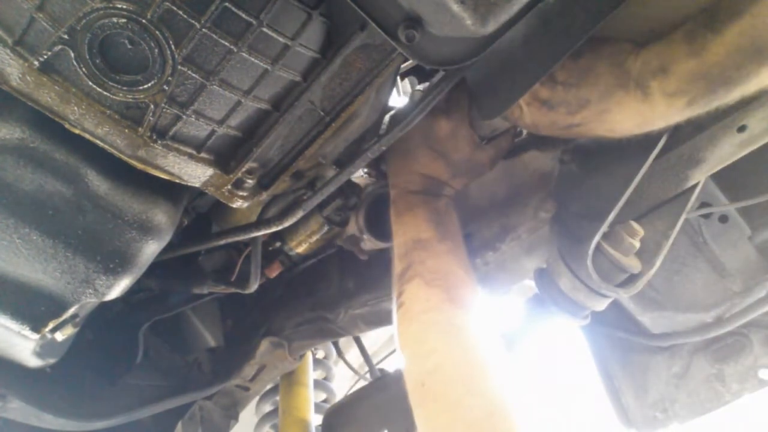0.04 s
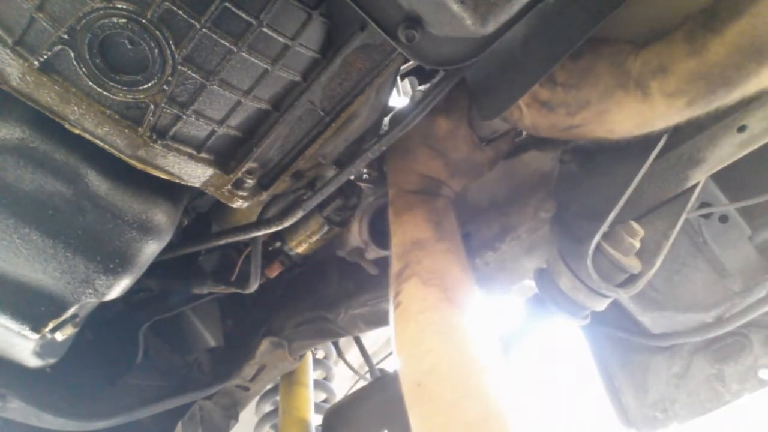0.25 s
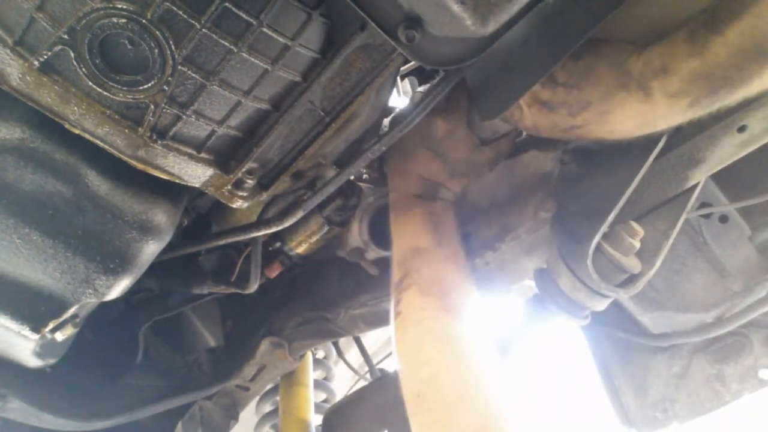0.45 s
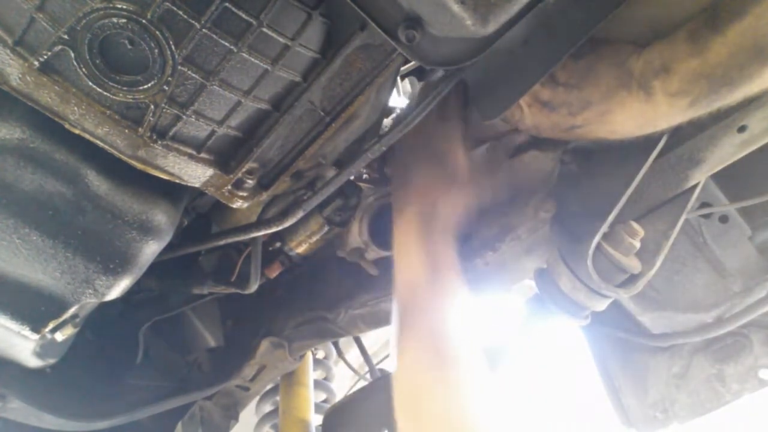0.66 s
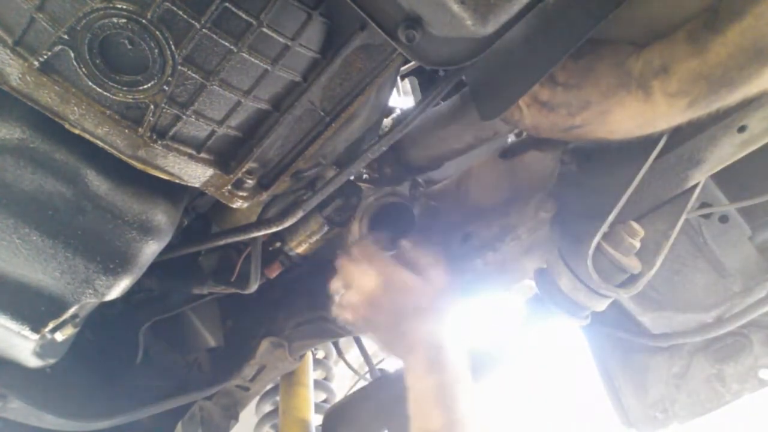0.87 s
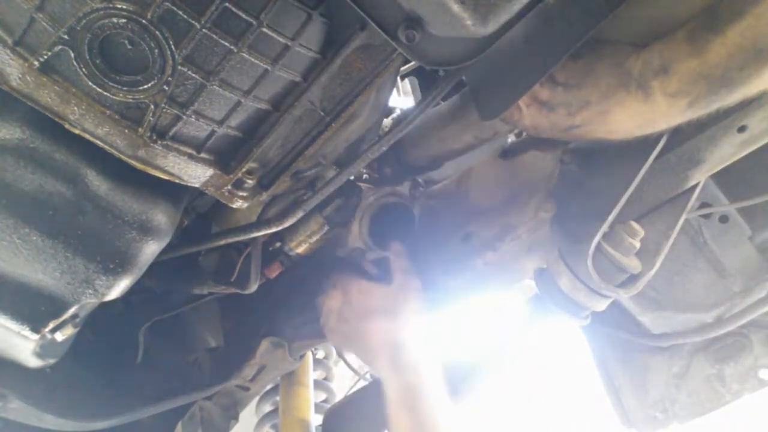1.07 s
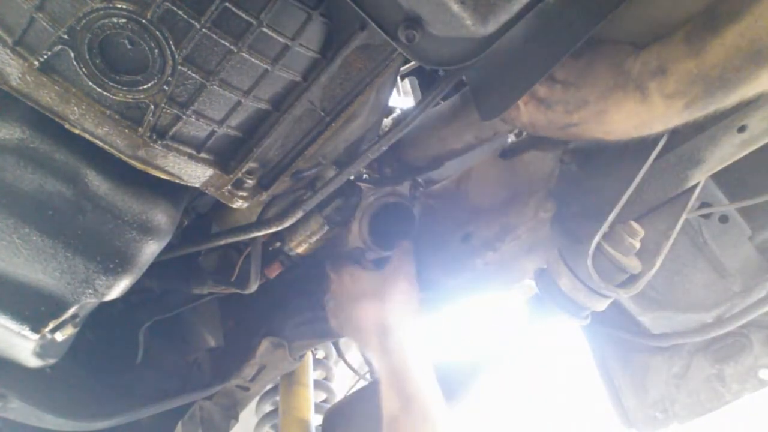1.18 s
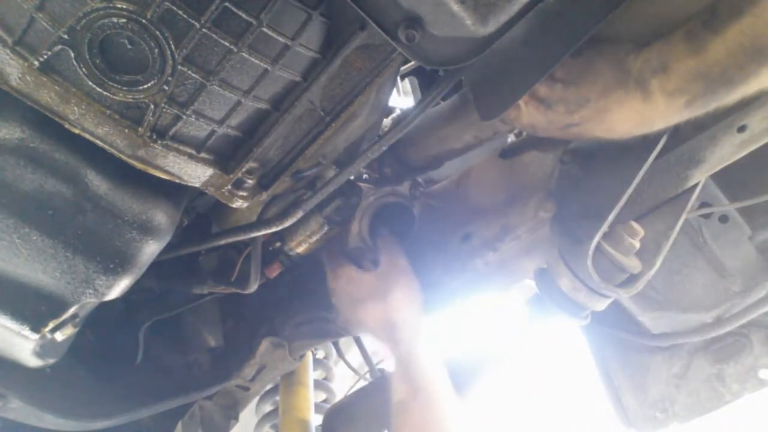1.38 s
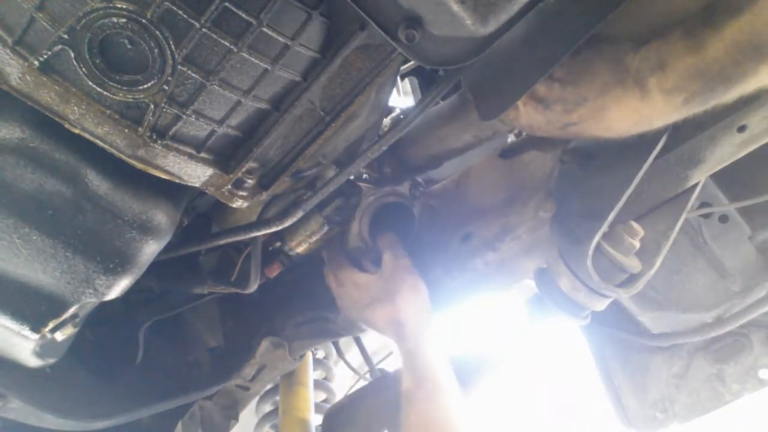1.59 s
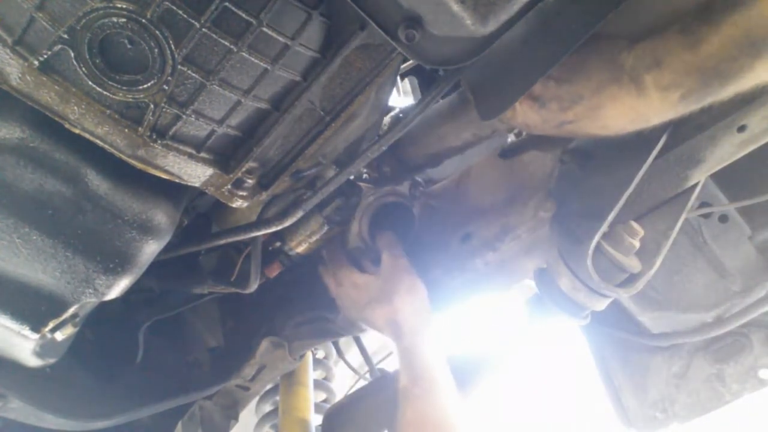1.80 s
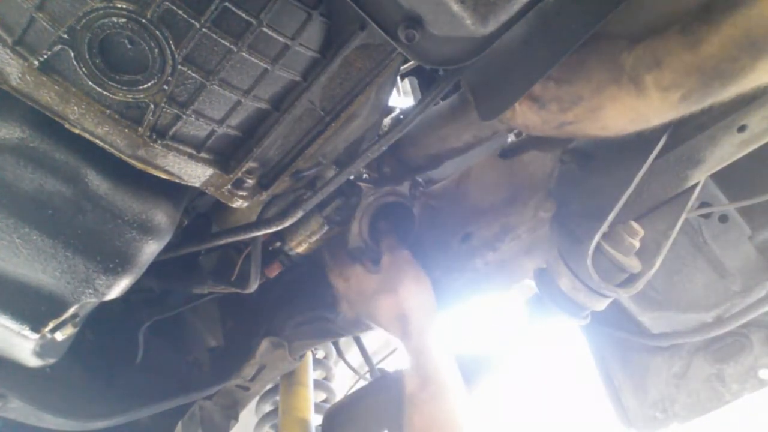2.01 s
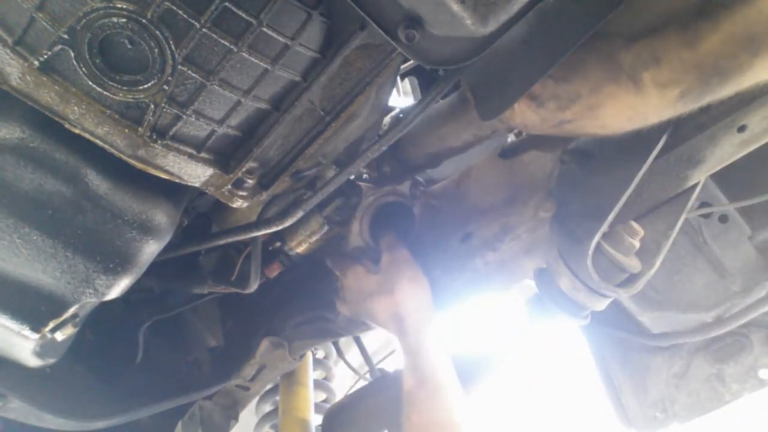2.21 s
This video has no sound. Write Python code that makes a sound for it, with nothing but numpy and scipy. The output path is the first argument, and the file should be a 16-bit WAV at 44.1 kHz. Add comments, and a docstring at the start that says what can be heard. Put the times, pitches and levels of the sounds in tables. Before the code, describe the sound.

A quick metal clatter with one hard clank under a vehicle, followed by faint handling.

```python
"""Garage, under a vehicle: hands work a metal part loose, heard close up in stereo.
A clink, a scrape with dull knocks, one hard clank, a last clink; underbody and thin panels ring on.
Then hands rub quietly over the parts, with faint pings, short slips and soft knocks.
Impacts are noise bursts plus decaying modes; sliding and rubbing are shaped noise."""
import sys
import numpy as np
from scipy import signal
from scipy.fft import rfft, irfft
from scipy.io import wavfile

SR = 44100
rng = np.random.default_rng(int(sys.argv[2]) if len(sys.argv) > 2 else 0)


def file_out(sig):
    """Save sig as 16-bit WAV at sys.argv[1]."""
    # one column per channel
    cols = np.atleast_2d(sig).T
    # limit, then scale
    lim = np.clip(cols, -1, 1)
    pcm = np.round(lim * 32767).astype(np.int16)
    wavfile.write(sys.argv[1], SR, pcm)


N = 99225
T = np.arange(N) / SR
BIN_HZ = np.fft.rfftfreq(N, 1 / SR)

# Metal contacts (time [s], crash [dB], tool [dB], part [dB], bolt [dB], tilt [dB/oct], damping [dB/s])
CLINKS = [(0.087, -32, -54, -64.5, -63, 4.5, 17), (.094, -25.5, -25, -59, -46, 2.5, -1),
          (.247, -28.5, -55.5, -61, -33.5, 10, 31.5), (0.2967, -13, -37.5, -21, -21.5, -1, 26),
          (0.334, -23.5, -38.5, -58, -34, 3.5, 15), (.379, -31.5, -54.5, -57.5, -32, 4.5, 45),
          (.460, -30.5, -70.5, -38, -33, 3.5, 58.5), (0.471, -32.5, -55.5, -48, -61, 2, 33.5),
          (2.148, -53, -68, -53, -70, -1, 22), (2.188, -56, -76, -49, -70, -3, 0)]
# Crash spectrum (frequency [Hz], density [dB])
CRASH_SPECTRUM = [(200, -17.5), (600, 3.5), (1100, 3), (2000, 1), (3100, -2), (4300, 0), (5600, -2.5),
                  (7500, -9), (10000, -17), (13000, -27.5), (15500, -40.5)]
# Crash decay (frequency [Hz], T60 [s])
CRASH_DECAY = [(500, 0.17), (2000, 0.36), (5000, 0.2), (9000, 0.2), (15000, 0.11)]
# Tool, loose part and bolt modes (frequency [Hz], level [dB], T60 [s])
TOOL_MODES = [(386.4, -10.5, 0.55), (387.7, -10.5, 0.46), (918, -12, 0.11), (1060, -12, 0.14),
              (1125, -6.5, .4), (1450, -6, .15), (1744, -9.5, .35), (2060, -2, .09), (2352, -8.5, .22),
              (2912, -15.5, .17), (3600, -8, .1), (4447, -9, .24), (5700, -8.5, 0.14), (9550, -7, .1)]
PART_MODES = [(2560, -9, .18), (3622, 1.5, .14), (5350, 1.5, .14), (6299, -2, .2), (7079, -12, .2),
              (8888, -19, .2), (9250, -19, .17), (11540, -23, .18)]
BOLT_MODES = [(4260, -7.5, .2), (4542, -3, .2), (6666, -5, .2), (11010, -20, .25)]

# Underbody blows (time [s], thud [dB], ring [dB], spot pitch [Hz], spot [dB], thud focus [dB/oct])
KNOCKS = [(.188, -25, -30.5, 522, -26.5, 7), (.216, -18, -24, 394, -11.5, 1.5),
          (.218, -19.5, -36.5, 955.6, -16.5, 10), (.243, -17.5, -16.5, 673, -15.5, -3),
          (.297, -15.5, -8.5, 675, -6.5, 2.5), (.333, -15.5, -14, 455.5, -4, 1.5),
          (.375, -21, -21, 502, -26, 1), (.403, -26.5, -29, 251, -26, 2.5),
          (.478, -26, -28.5, 469.6, -41, 2), (.535, -44, -44, 258, -33, -4.5),
          (2.105, -30.5, -45.5, 407, -38.5, 15), (2.148, -43.5, -49, 422, -38, 5)]
# Thud spectrum (frequency [Hz], density [dB])
THUD_SPECTRUM = [(30, -34), (55, -15.5), (100, -3), (150, -12.5), (260, -2.5), (420, -3), (680, -5.5),
                 (810, -12.5), (1000, -6.5), (1400, -22), (2500, -31.5), (8000, -63.5)]
# Thud decay in the garage (frequency [Hz], T60 [s])
THUD_DECAY = [(60, 0.81), (250, 0.78), (500, 0.6), (1000, 0.56), (3000, .4)]
# Underbody and thin panel modes (frequency [Hz], level [dB], T60 [s])
BODY_MODES = [(106.2, -15.5, 0.89), (171.8, -10, 0.51), (206, -9.5, 0.85), (257.75, -11.5, 0.66),
              (388.5, -14, 0.68), (432, -4.5, 0.28), (503.7, -2, 0.35), (602, -7.5, 0.3),
              (676.2, -3.5, 0.3), (990, -9, 0.16)]
PANEL_MODES = [(188.4, -56, 8), (252.3, -43, 2.2), (258.6, -42.5, 2.6), (554.5, -50, 2.2),
               (635.2, -56, 3.4), (699.8, -55, 2), (796.7, -63, 15), (952.8, -53, 2.3)]

# Slides (time [s], length [s], start [dB], end [dB], tilt [dB/oct], zing [Hz], focus [dB/oct])
SCRAPES = [(0.155, 0.032, -36.5, -27.5, -3, 5600, -1), (0.203, 0.049, -30.5, -22.5, -3, 5600, -1),
           (0.659, 0.033, -59, -48.5, 3.5, 5600, 2.5), (0.707, 0.031, -59.5, -56.5, 3.5, 5600, 6),
           (1.443, 0.016, -41, -45, -1.5, 5820, 3), (1.455, 0.0091, -39, -43, -0.5, 5670, 10),
           (2.017, .014, -48, -53.5, 7, 5830, 5), (2.139, 0.011, -40, -43, -3, 2940, 3.5),
           (2.179, 0.052, -49, -47.5, 1, 5600, -1.5)]
# Sliding friction spectrum (frequency [Hz], density [dB])
SCRAPE_SPECTRUM = [(300, -16.5), (1200, -1.5), (2200, -2.5), (3200, -0.5), (4400, 0.5), (5800, 2.5),
                   (7500, -6), (9500, -9.5), (12500, -15.5), (15500, -26.5)]

# Bounces of a small piece (time [s], level [dB])
PINGS = [(.912, -61.5), (.924, -55), (.972, -57)]
# Its modes (frequency [Hz], level [dB], T60 [s])
PING_MODES = [(1770, -7.5, 0.16), (2005, 3.5, 0.24), (2067, -5.5, 0.14), (2250, -11, 0.067),
              (2433, -3.5, 0.07), (6800, -8, 0.088), (10860, -9, 0.18)]

# Hand movement (time [s], rustle [dB], rumble [dB])
HAND_LEVELS = [(0, -54.5, -48), (.07, -45, -45), (.3, -71, -40), (.62, -58, -58), (0.759, -65.5, -58),
               (.88, -68, -57.5), (1.1, -74.5, -62), (1.28, -61, -60), (1.42, -62.5, -52),
               (1.55, -59, -52.5), (1.64, -55, -47.5), (1.8, -59, -51), (1.95, -57.5, -49),
               (2.03, -55.5, -46.5), (2.121, -48, -45.5), (2.25, -65, -47.5)]
# Skin, shifting part and garage spectra (frequency [Hz], density [dB])
RUSTLE_SPECTRUM = [(400, -9.5), (1300, -15.5), (2000, -2.5), (3500, -3.5), (4800, -2), (5800, 2.5),
                   (7500, -5.5), (11000, -9.5), (13000, -9.5), (15500, -20)]
RUMBLE_SPECTRUM = [(25, -8), (50, -12), (95, 6), (140, -2), (260, -3.5), (400, -13), (800, -14.5),
                   (1400, -21.5), (4000, -36)]
GARAGE_SPECTRUM = [(25, -4), (95, -6.5), (260, -2), (450, -13), (900, -30.5), (1500, -34.5),
                   (5000, -34), (15000, -38.5)]

# Likeness of the two microphones (frequency [Hz], correlation [-1..1])
MIC_CORRELATION = [(30, 1), (110, 1), (250, 0.9), (500, 0.74), (1000, 0.1), (2000, -0.08), (15000, 0)]
# Stereo balance (frequency [Hz], left minus right [dB])
MIC_BALANCE = [(100, 1.5), (330, 0), (650, 1.5), (1300, 1), (2600, 2.5), (5200, 5.5), (7500, 0.5),
               (9500, -6), (15000, -6.5)]
# Two random curves for the metalwork's small resonances
RIPPLE = rng.standard_normal((2, 2048))


def clinks():
    """Tool, loose part and bolt collide: a bright crash and the ring of each, damped by the grip."""
    out = np.zeros((2, N))
    for time_s, crash_db, tool_db, part_db, bolt_db, tilt_db_oct, damping_db_per_s in CLINKS:
        hiss = metalwork(noise(CRASH_SPECTRUM, tilt_db_oct))
        clink = amp(crash_db) * burst(hiss, CRASH_DECAY, rise_s=0.0012, direct_s=0.014, tail_db=-2)
        for modes, db in ((TOOL_MODES, tool_db), (PART_MODES, part_db), (BOLT_MODES, bolt_db)):
            clink += amp(db) * ring(modes, rise_s=0.0011, waver=0.81, waver_per_s=61, full_waver_hz=3000)
        grip = amp(-max(damping_db_per_s, 0) * T)
        add(out, time_s, clink * grip)
    return out


def knocks(ring_focus_db_oct=3):
    """Blows thud through the underbody, hum at the struck spot and ring the modes near its pitch."""
    out = np.zeros((2, N))
    for time_s, thud_db, ring_db, spot_hz, spot_db, focus_db_oct in KNOCKS:
        rumble = noise(THUD_SPECTRUM, focus_hz=spot_hz, focus_db_oct=focus_db_oct)
        thud = burst(rumble, THUD_DECAY, rise_s=0.0015, direct_s=0.051, tail_db=-8.5)
        spot = ring([(spot_hz, 0, 0.11)], rise_s=0.004, waver=0.3, waver_per_s=60, full_waver_hz=700)
        modes = [(hz, db - ring_focus_db_oct * abs(np.log2(hz / spot_hz)), t60_s)
                 for hz, db, t60_s in BODY_MODES]
        body = ring(modes, rise_s=0.004, waver=0.3, waver_per_s=25, full_waver_hz=500)
        add(out, time_s, amp(thud_db) * thud + amp(spot_db) * spot + amp(ring_db) * body)
    return out


def panels(start_s=0.42):
    """Thin panels sing on after the hardest blow."""
    out = np.zeros((2, N))
    add(out, start_s, ring(PANEL_MODES, rise_s=0.03, waver=0.13, waver_per_s=16))
    return out


def scrapes(rise_s=0.0052, t60_s=0.2):
    """Metal slides on metal: friction noise follows the pressure, then dies away."""
    out = np.zeros((2, N))
    for time_s, length_s, start_db, end_db, tilt_db_oct, zing_hz, focus_db_oct in SCRAPES:
        slide_db = np.interp(T, [0, length_s], [start_db, end_db])
        decay_db = 60 * np.maximum(T - length_s, 0) / t60_s
        friction = metalwork(noise(SCRAPE_SPECTRUM, tilt_db_oct, zing_hz, focus_db_oct))
        add(out, time_s, amp(slide_db - decay_db) * np.minimum(T / rise_s, 1) * friction)
    return out


def pings():
    """A small metal piece is touched and bounces."""
    out = np.zeros((2, N))
    for time_s, db in PINGS:
        add(out, time_s, amp(db) * ring(PING_MODES, rise_s=0.0038, waver=1.2, waver_per_s=190))
    return out


def hands(grains_per_s=160, grain_db=1.5):
    """Skin catches and slips over the parts, which rumble softly as they shift."""
    time_s, rustle_db, rumble_db = np.transpose(HAND_LEVELS)
    grain = unit_rms(amp(grain_db * glide(rng.standard_normal(8192), T * grains_per_s)))
    rustle = amp(np.interp(T, time_s, rustle_db)) * grain * noise(RUSTLE_SPECTRUM)
    rumble = amp(np.interp(T, time_s, rumble_db)) * noise(RUMBLE_SPECTRUM)
    return rustle + rumble


def garage(level_db=-59.5):
    """Steady low background noise."""
    return amp(level_db) * noise(GARAGE_SPECTRUM)


def ring(modes, rise_s, waver, waver_per_s, full_waver_hz=1, mic_gap_s=0.00026):
    """Decaying sines, each from its own direction, wavering as reflections overlap."""
    out = np.zeros((2, N))
    for hz, db, t60_s in modes:
        t = T[:int(1.5 * t60_s * SR)]
        lag_s = np.array([[0], [rng.uniform(-1.2, 1) * mic_gap_s]])
        depth = waver * min(hz / full_waver_hz, 1)
        echoes = 1 + depth * np.array([glide(steps, t * waver_per_s) for steps in random_pair(512)])
        tone = (echoes * np.exp(2j * np.pi * hz * (t - lag_s))).imag / np.sqrt(1 + depth ** 2)
        add(out, 0, mic_gains(hz)[:, None] * amp(db - 60 * t / t60_s) * tone)
    return out * np.minimum(T / rise_s, 1)


def burst(source, decay, rise_s, direct_s, tail_db):
    """Dense modes struck at once: a strong direct part, then a tail dying band by band."""
    hz, t, bands = signal.stft(source, SR, nperseg=512)
    bands = bands * amp(-60 * t / lookup(decay, hz)[:, None])
    decayed = signal.istft(bands, SR, nperseg=512)[1][:, :N]
    envelope = amp(tail_db) + (1 - amp(tail_db)) * np.exp(-T / direct_s)
    return decayed * np.minimum(T / rise_s, 1) * envelope


def metalwork(x, step_hz=55, depth_db=4.5, full_depth_hz=1800):
    """Narrow, irregular treble resonances, partly shared by both channels."""
    curves = (RIPPLE[0], RIPPLE.sum(0) / np.sqrt(2))
    ripple = np.tanh([glide(curve, BIN_HZ / step_hz) for curve in curves])
    gain_db = depth_db * ripple * np.minimum(BIN_HZ / full_depth_hz, 1) ** 2
    return unit_rms(irfft(rfft(x) * amp(gain_db), N))


def noise(spectrum, tilt_db_oct=0, focus_hz=500, focus_db_oct=0):
    """Shaped stereo noise at RMS 1; positive focus falls away on both sides of focus_hz."""
    left, independent = random_pair(len(BIN_HZ))
    correlation = lookup(MIC_CORRELATION, BIN_HZ)
    right = correlation * left + np.sqrt(1 - correlation ** 2) * independent
    octaves = np.log2((BIN_HZ + 1) / focus_hz)
    gain_db = lookup(spectrum, BIN_HZ) + tilt_db_oct * octaves - focus_db_oct * abs(octaves)
    return unit_rms(irfft(np.array([left, right]) * mic_gains(BIN_HZ) * amp(gain_db), N))


def mic_gains(hz):
    """Left and right gains."""
    balance_db = lookup(MIC_BALANCE, hz)
    return amp(np.array([balance_db, -balance_db]) / 2)


def random_pair(count):
    """Two rows of complex Gaussian values."""
    return rng.standard_normal((2, count)) + 1j * rng.standard_normal((2, count))


def glide(steps, index):
    """Linear interpolation at a fractional index."""
    return np.interp(index, np.arange(len(steps)), steps)


def lookup(table, hz):
    """Table value on a log-frequency axis."""
    table_hz, values = np.transpose(table)
    return np.interp(np.log(hz + 1), np.log(table_hz), values)


def amp(db):
    """Decibels to gain."""
    return 10 ** (np.asarray(db) / 20)


def unit_rms(x):
    """Scale to RMS 1."""
    return x / np.sqrt(np.mean(x ** 2) + 1e-20)


def add(mix, time_s, sound):
    """Mix a sound in at time_s."""
    span = mix[:, round(time_s * SR):][:, :sound.shape[1]]
    span += sound[:, :span.shape[1]]


def scene():
    """All sources over the garage background."""
    return knocks() + panels() + clinks() + pings() + scrapes() + hands() + garage()


def record(dry):
    """Microphone low cut, clipping at full scale, band limit."""
    low_cut_hz, band_limit_hz = 42, 15600
    low_cut = signal.butter(2, low_cut_hz, "high", fs=SR, output="sos")
    band_limit = signal.firwin(511, band_limit_hz, window=("kaiser", 9), fs=SR)
    clipped = np.clip(signal.sosfilt(low_cut, dry), -1, 1)
    return signal.oaconvolve(clipped, band_limit[None], "same")


dry = scene()
out = record(dry)
file_out(out)
```